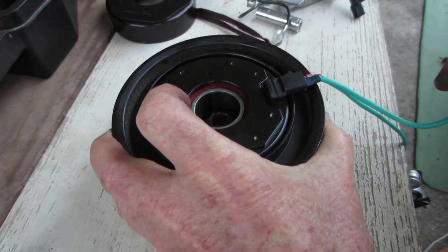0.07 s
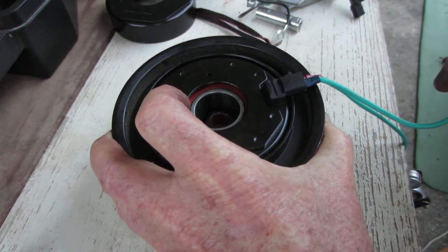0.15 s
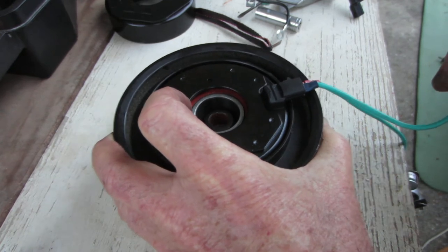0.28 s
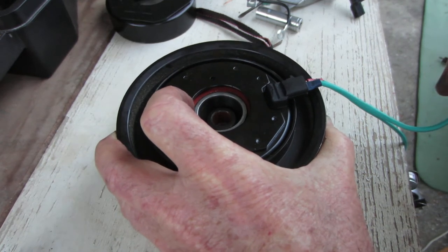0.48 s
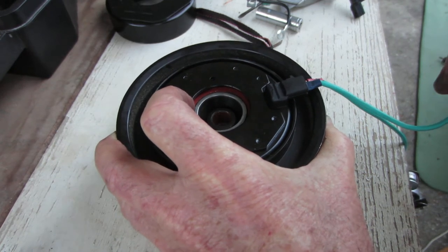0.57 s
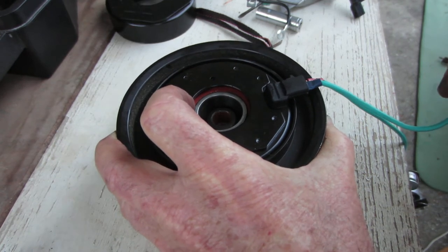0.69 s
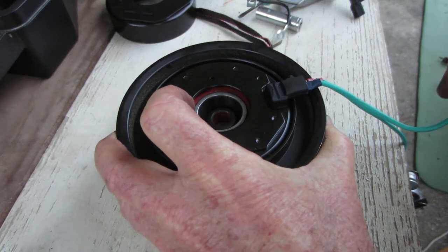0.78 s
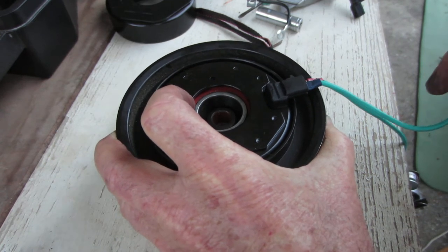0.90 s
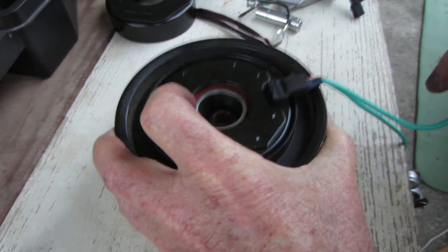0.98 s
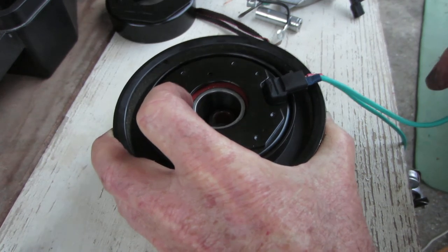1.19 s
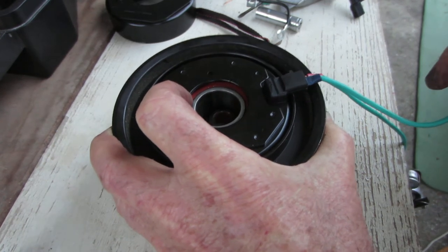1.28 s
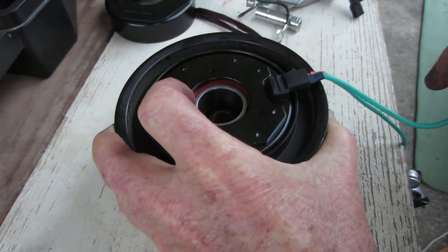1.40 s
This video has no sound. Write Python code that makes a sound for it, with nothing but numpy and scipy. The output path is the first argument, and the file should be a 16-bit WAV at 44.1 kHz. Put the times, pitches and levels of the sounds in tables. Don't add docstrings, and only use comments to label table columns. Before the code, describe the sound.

An electromagnetic clutch clacks loudly at 0.2 seconds, its steel plate hitting the pulley in a rapid double snap, with short ringing and tiny bounces until 0.25. Quiet traffic hum and faint bird chirps lie behind. At 0.86 a lead contact ticks and scrapes; from 0.95 to 1.03 the plate releases in dull thuds and rattling. Close microphone, clipped peaks, slight workshop echo, birds again near 1.2.

```python
import sys
import numpy as np
from scipy import signal
from scipy.fft import rfft, irfft, next_fast_len
from scipy.io import wavfile
from scipy.ndimage import map_coordinates

SR = 44100
rng = np.random.default_rng(int(sys.argv[2]) if len(sys.argv) > 2 else 0)


def amplitude_ratio(level_db):
    exponent = np.asarray(level_db, float) / 20
    return 10 ** exponent


def waveform_to_disk(signal):
    frames = np.transpose(np.atleast_2d(signal))
    scaled = np.clip(frames, -1, 1) * 32767
    samples = np.round(scaled).astype(np.int16)
    wavfile.write(sys.argv[1], SR, samples)


N = 63945
T = np.arange(SR // 4) / SR
RISE_S = 0.000055


def along(points, hz):
    point_hz, value = np.transpose(points)
    return np.interp(np.log(hz + 1), np.log(point_hz + 1), value)


def fade(t60):
    return amplitude_ratio(-60 * T / np.maximum(t60, 1e-4))


def sine(hz):
    return np.sin(2 * np.pi * hz * T)


def onset():
    return 1 - np.exp(-T / RISE_S)


def add(track, s, x):
    k = round(s * SR)
    track[k:k + len(x)] += x[:len(track) - k]


def colour(x, spectrum):
    size = next_fast_len(len(x) + SR // 5)
    gain = amplitude_ratio(along(spectrum, np.fft.rfftfreq(size, 1 / SR)))
    y = irfft(rfft(x, size) * gain, size)[:len(x)]
    return y / np.sqrt(np.mean(y ** 2))


def noise(length, spectrum):
    return colour(rng.standard_normal(length), spectrum)


def ring(modes, scatter_db, buzz=0):
    out = np.zeros(len(T))
    for hz, db, t60 in modes:
        level = amplitude_ratio(db + scatter_db * rng.normal())
        drift = buzz * np.cumsum(rng.standard_normal(len(T)))
        out += level * fade(t60) * np.sin(2 * np.pi * hz * T + drift)
    return out


def wobble(rate):
    knots = rng.standard_normal(int(N * rate / SR) + 4)
    return map_coordinates(knots, [np.arange(N) * rate / SR])


def hum_and_hiss():
    # frequency in Hz, level in dB.
    hum_spectrum = [(12, -30), (20, -0.5), (49, -2), (170, -5), (298, -19), (859, -11), (2590, -26.5),
                    (3070, -30.5), (3500, -33.5), (4550, -75.5), (7700, -120)]
    # frequency in Hz, level in dB.
    hiss_spectrum = [(1760, -22), (3000, -6.5), (4180, -8.5), (7020, -8.5), (11600, -25.5), (15700, -30.5)]
    hum = amplitude_ratio(-53 + 1.1 * wobble(6.2)) * noise(N, hum_spectrum)
    return hum + amplitude_ratio(-76) * noise(N, hiss_spectrum)


def birds():
    # start in seconds, length in seconds, first and last pitch in Hz, level in dB.
    notes_sung = [
        (0.087, 0.028, 4750, 4230, -71),
        (.105, 0.023, 4750, 4780, -77),
        (.106, 0.012, 3500, 4100, -71),
        (0.13, 0.013, 4000, 3880, -66.5),
        (0.163, 0.036, 3960, 3900, -75),
        (1.064, .03, 3840, 3820, -73),
        (1.18, 0.11, 3300, 3270, -73),
        (1.229, 0.029, 2825, 3400, -64),
        (1.259, 0.038, 2950, 3250, -66.5),
        (1.303, 0.068, 3300, 2900, -74.5),
    ]
    out = np.zeros(N)
    for s, length, from_hz, to_hz, db in notes_sung:
        u = np.clip(T / length, 0, 1)
        glide = np.sin(2 * np.pi * np.cumsum(from_hz + (to_hz - from_hz) * u) / SR)
        add(out, s, amplitude_ratio(db) * np.sin(np.pi * u) * glide)
    return out


def coil_whine():
    # start in seconds, end in seconds, pitch in Hz, level in dB.
    whine = (.67, .86, 5690, -87)
    start, end, hz, db = whine
    t = np.arange(N) / SR
    on = np.clip(np.minimum(t - start, end - t) / 0.02, 0, 1)
    return on * amplitude_ratio(db + 3 * wobble(40)) * np.sin(2 * np.pi * hz * t + 0.6 * wobble(52))


def shop(x):
    # frequency in Hz, t60 in seconds.
    shop_t60 = [(150, 0.48), (600, 0.22), (2000, .25), (6000, 0.26), (10000, 0.28), (15000, .2)]
    hz, t, grid = signal.stft(rng.standard_normal(SR // 2), SR, nperseg=256)
    decay = amplitude_ratio(-60 * t / along(shop_t60, hz)[:, None])
    tail = signal.istft(grid * decay, SR, nperseg=256)[1]
    delay_s = 0.004
    delayed = np.pad(x, (round(delay_s * SR), 0))
    return signal.fftconvolve(delayed, tail / np.linalg.norm(tail))[:N]


def lead():
    # start in seconds, click in dB, click pitch in Hz, scrape in dB, scrape t60 in seconds.
    ticks = [
        (0.8573, -64, 7880, -51, 0.078),
        (.8613, -11, 6400, -29.5, 0.012),
        (0.864, -28, 8500, -32, 0.0068),
        (0.8637, -23, 4970, -38.5, 0.014),
        (0.872, -63, 6950, -49, 0.032),
    ]
    # frequency in Hz, level in dB.
    scrape_spectrum = [(1060, -43), (1800, -2), (3520, -4), (6110, -9.5), (7870, -4), (9960, 5.5),
                       (10900, -17), (15700, -28)]
    clip_modes = [(956, -37.5, 0.053), (1320, -33.5, 0.029), (1520, -35.5, 0.028)]
    click_t60, ring_s = 0.0012, 0.8642
    out = np.zeros(N)
    for s, db, hz, scrape_db, t60 in ticks:
        click = -amplitude_ratio(db) * fade(click_t60) * onset() * sine(hz)
        scrape = amplitude_ratio(scrape_db) * fade(t60) * noise(len(T), scrape_spectrum)
        add(out, s, click + scrape)
    add(out, ring_s, ring(clip_modes, 0))
    return out


def rattle():
    # start in seconds, rise in seconds, t60 in seconds, level in dB.
    clumps = [
        (0.9483, 0.0015, 0.036, -31.5),
        (.953, 0.0017, 0.068, -32),
        (0.9741, .003, .03, -28),
        (0.979, 0.0023, .07, -23),
        (1.0009, 0.0027, 0.036, -33),
        (1.006, .0015, 0.037, -20),
        (1.015, 0.0016, 0.029, -37.5),
    ]
    # frequency in Hz, level in dB.
    chatter_spectrum = [(530, -5.5), (900, -1), (1140, 2.5), (1730, -9.5), (2170, -6), (3000, -13.5),
                        (6200, -22.5), (6900, -20), (15500, -53.5)]
    # frequency in Hz, level in dB, t60 in seconds.
    loose_modes = [(2336, 2, 0.0075), (3360, -11, 0.012), (4100, 6, 0.0082), (5550, -2, .015),
                   (7000, 0, 0.014), (9040, 6, 0.022)]
    contacts_per_s, spread_db = 2700, 2.5
    hits = rng.random(N) < contacts_per_s / SR
    grains = hits * rng.choice([-1, 1], N) * amplitude_ratio(spread_db * rng.standard_normal(N))
    shape = np.zeros(N)
    for s, rise, t60, db in clumps:
        swell = np.minimum(T / rise, 1) ** 2
        add(shape, s, amplitude_ratio(db) * swell * amplitude_ratio(-60 * np.maximum(T - rise, 0) / t60))
    contacts = shape * colour(grains + 0.15 * rng.standard_normal(N), chatter_spectrum)
    return contacts + 0.024 * signal.fftconvolve(contacts, ring(loose_modes, 0))[:N]


def thuds():
    push_s = [.2425, .749, .767, .9466, .9505, .956, .9717, .9775, .9797, .9853, .9986, 1.0031, 1.01, 1.012,
              1.0235]
    # level in dB, swing in Hz, its t60 in seconds, direction (sign), contact time in ms.
    pushes = [(-20.5, 191, 0.017, 1, 0.42), (-35.5, 90, .04, -0.92, 0.68), (-46, 110, 0.029, -1.22, 1),
              (-2, 556, 0.0072, 1, 0.24), (-6.5, 352, 0.0099, 1, .2), (-27, 600, 0.0073, -0.64, 0.13),
              (-3, 265, 0.016, 1, 0.18), (-16.5, 537, 0.014, -0.79, 0.11),
              (-11.5, 540, 0.0052, -0.51, 0.13), (-23, 370, 0.0087, -0.72, .25), (-8, 258, 0.014, 1, 0.13),
              (-11, 360, 0.0071, 1, 0.32), (-10, 550, 0.0061, 1, 0.49), (-11.5, 290, 0.0073, -1, 0.16),
              (-27, 270, 0.16, -0.13, 0.65)]
    # frequency in Hz, level in dB, t60 in seconds.
    housing_modes = [(152.7, -13.5, .06), (262, -22.5, 0.11), (440.4, -20, 0.033), (1060, -18, 0.026),
                     (1500, -30, 0.017)]
    out = np.zeros(N)
    for s, (db, hz, t60, way, contact_ms) in zip(push_s, pushes):
        width = contact_ms / 1000
        push = np.exp(-0.5 * ((T[:SR // 100] - 3 * width) / width) ** 2)
        swing = fade(t60) * np.cos(2 * np.pi * hz * T)
        body = swing + ring(housing_modes, scatter_db=2, buzz=0.04)
        add(out, s - 3 * width, np.sign(way) * amplitude_ratio(db) * 2 * np.convolve(body, push / push.sum()))
    return out


def snaps():
    landing_s = [.2004, .2011, .2168, .2260, .2287, .2475, .2508]
    # level in dB, plate swing in Hz, its t60 in seconds, steel ring in dB, crack in dB.
    landings = [
        (-11, 1350, .012, -11.5, -17.5),
        (3.5, 1230, 0.014, -9, -20.5),
        (8, 1650, 0.0038, -5.5, -11.5),
        (-26.5, 1950, 0.058, -24, -30),
        (-17, 1090, .03, -22.5, -34),
        (-40, 1098, .04, -32.5, -41),
        (-25, 1050, 0.017, -42, -44),
    ]
    # frequency in Hz, level in dB, t60 in seconds.
    steel_modes = [(480, -4, 0.023), (1134, -6.5, .06), (1850, -15.5, .03), (2843, -4, .012),
                   (3500, -8.5, 0.011), (4340, -5, .02), (4750, -2, .015), (5606, -4.5, .018),
                   (6400, -4.5, 0.014), (7230, -10, .015), (8584, -6.5, .015), (9680, -10.5, 0.02),
                   (10660, -16.5, 0.031), (14300, -19.5, .015)]
    # frequency in Hz, level in dB, t60 in seconds.
    rim_modes = [(1162, -19, 0.13), (1967, -22.5, 0.11), (6590, -36, 0.18)]
    # frequency in Hz, level in dB.
    crack_spectrum = [(1060, -32.5), (1800, -3), (3450, -18), (4740, -13), (6000, -18.5), (8780, -15),
                      (11600, -35.5), (14200, -30.5), (15700, -39)]
    crack_trim_db, crack_t60 = 0.5, 0.02
    out = np.zeros(N)
    for s, (db, hz, t60, steel_db, crack_db) in zip(landing_s, landings):
        plate_and_pulley = ring(steel_modes, scatter_db=3.5, buzz=0.13) / 2
        steel = amplitude_ratio(steel_db) * (plate_and_pulley + ring(rim_modes, 1))
        crack = amplitude_ratio(crack_db + crack_trim_db) * fade(crack_t60) * noise(len(T), crack_spectrum)
        swing = -amplitude_ratio(db) * fade(t60) * sine(hz)
        add(out, s, (swing + steel + crack) * onset())
    return out


def scene():
    near = snaps() + thuds() + rattle() + lead()
    bass_hz = 110
    near = signal.lfilter(*signal.butter(2, bass_hz, "high", fs=SR), near)
    echo = amplitude_ratio(-20.5) * shop(near)
    background = birds() + coil_whine() + hum_and_hiss()
    return (near + echo + background)[None]


def roll_off(x):
    return signal.sosfilt(signal.butter(12, 15820, fs=SR, output="sos"), x)


def record(dry):
    # time in seconds, gain in dB.
    gain_curve = [
        (0.218, -2),
        (0.302, -5),
        (.45, -10),
        (.65, -7),
        (.95, -4.5),
        (1.2, -2.5),
        (1.399, -1.5),
    ]
    s, db = np.transpose(gain_curve)
    x = dry * amplitude_ratio(np.interp(np.arange(N) / SR, s, db))
    top_hz = 15500
    x = signal.sosfilt(signal.cheby2(10, 50, top_hz * 1.04, fs=SR, output="sos"), x)
    ceiling, hardness = 1, 12
    x = x / (1 + np.abs(x / ceiling) ** hardness) ** (1 / hardness)
    return roll_off(x)


dry = scene()
out = record(dry)
waveform_to_disk(out)
```